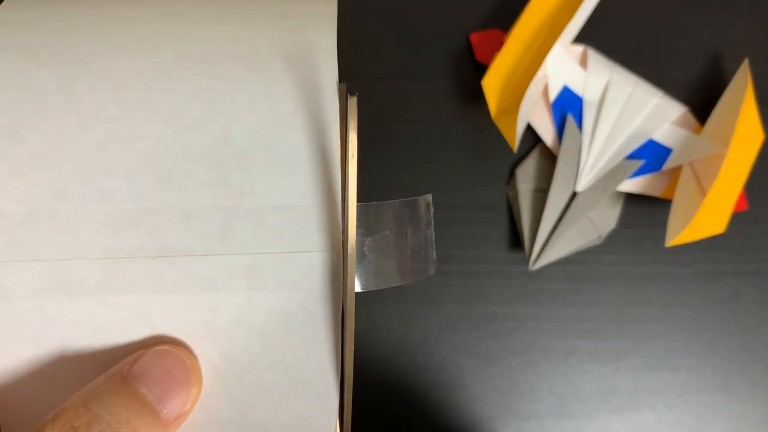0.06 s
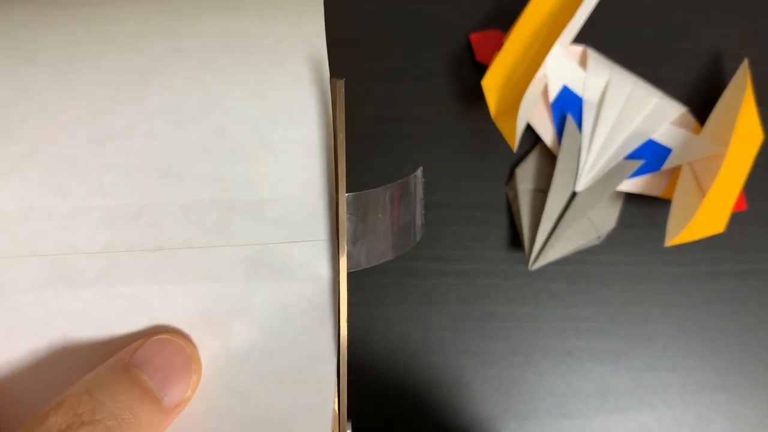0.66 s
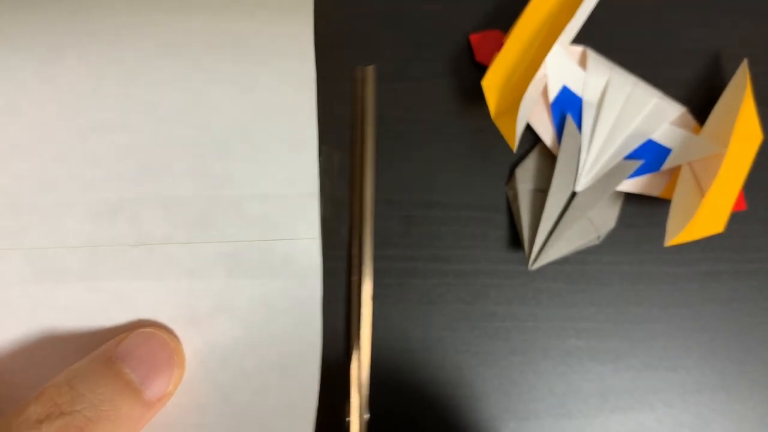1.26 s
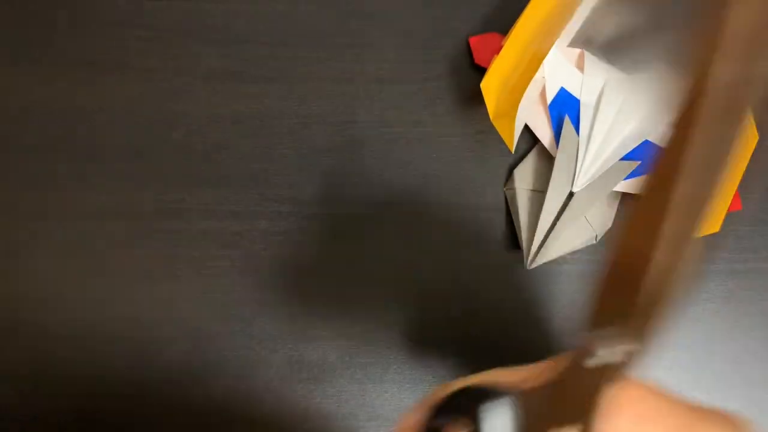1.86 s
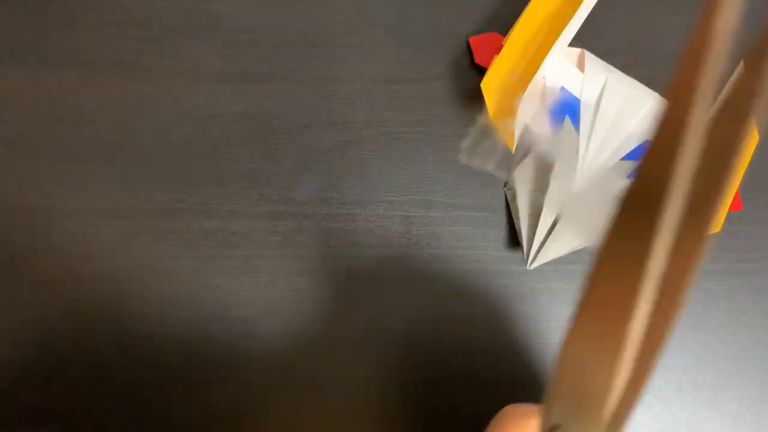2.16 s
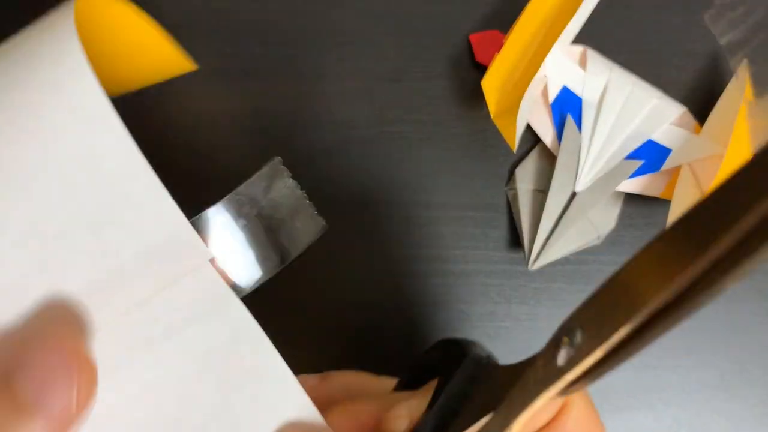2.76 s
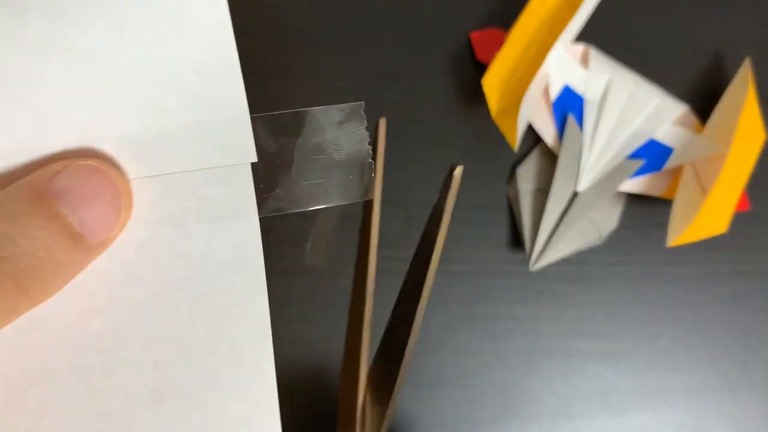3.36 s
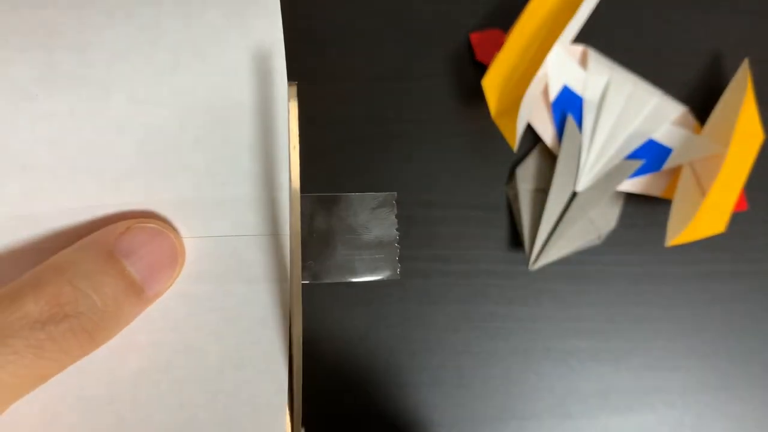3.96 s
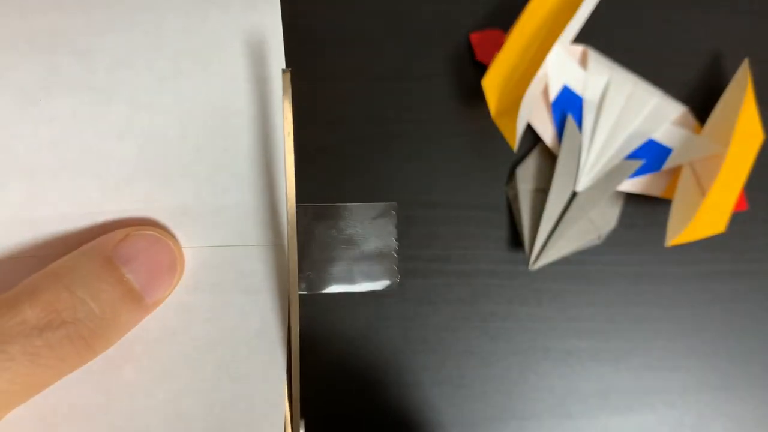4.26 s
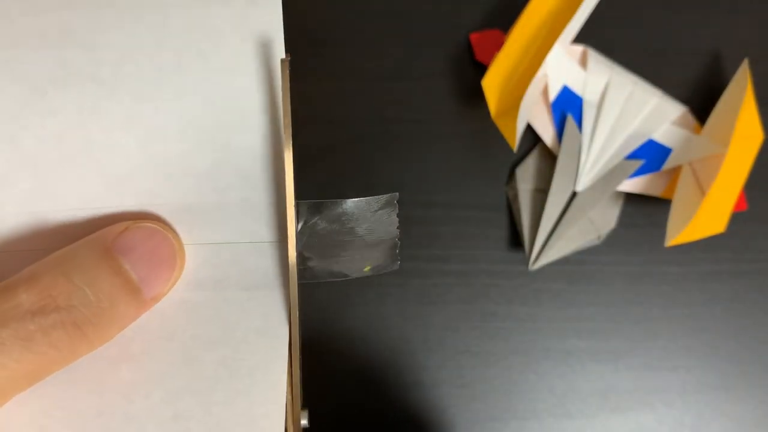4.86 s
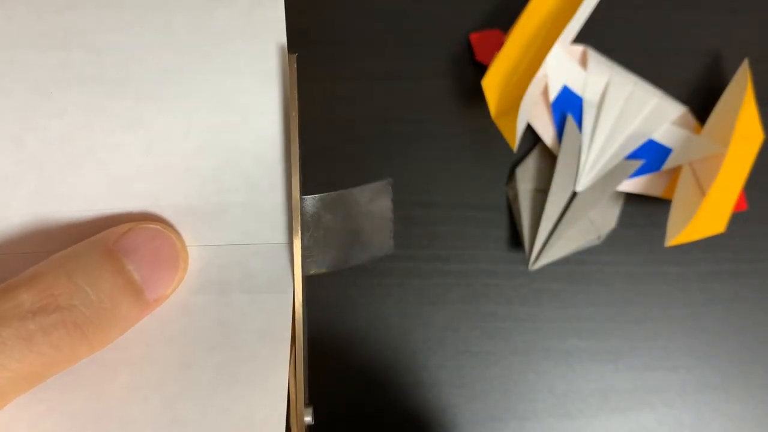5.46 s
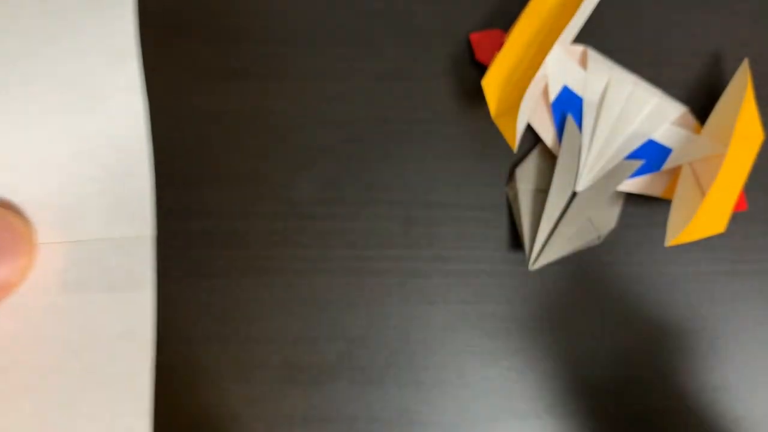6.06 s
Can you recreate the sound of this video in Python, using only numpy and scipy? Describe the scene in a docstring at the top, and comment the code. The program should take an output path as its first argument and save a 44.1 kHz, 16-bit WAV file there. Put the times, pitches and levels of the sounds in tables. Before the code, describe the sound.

Close to the microphone in a quiet little room, paper stirs faintly and scissors finish a snip through sticky tape. The paper then buckles, gives one sharp crack, the loudest sound, and flutters and crinkles as it is handled. After a stretch of softer brushing, the scissors work through more tape in tiny, slightly squeaky rasps, shutting with a light metal click and a soft thud on the table.

```python
"""Scissors trim clear tape from the edge of a paper sheet on a table, close up in a small quiet room.
The first cut ends in two short rasps and a clack of steel. The sheet is lifted and turned round:
it buckles with dull pops, snaps straight, flutters and brushes over the table, with crisp ticks of tape.
Then the blades rasp through a second strip in short slips and close with a clack and a soft table knock."""
import sys
import numpy as np
from scipy import signal
from scipy.fft import rfft, irfft, next_fast_len
from scipy.io import wavfile
from scipy.ndimage import uniform_filter1d

SR = 44100
rng = np.random.default_rng(int(sys.argv[2]) if len(sys.argv) > 2 else 0)


def master_out(mix):
    """Clip the mix to full scale and print it as 16-bit PCM to the path in sys.argv[1]."""
    frames = np.transpose(np.atleast_2d(mix))
    ceiling = np.clip(frames, -1, 1)
    pcm = np.round(ceiling * 32767).astype(np.int16)
    wavfile.write(sys.argv[1], SR, pcm)


N = 274302
TIME = np.arange(N) / SR

# tone of the room's rumble: (frequency [Hz], gain [dB])
RUMBLE_EQ = [(30, -22), (48, 7), (62, -3.5), (85, -14), (135, -17), (230, -28), (500, -45.5), (1500, -61)]
# tone of the faint background hiss: (frequency [Hz], gain [dB])
AIR_EQ = [(200, 12), (1000, 7), (3000, 0), (8000, -9), (16000, -10.5)]
# soft knocks on the table: (time [s], peak [dB], pitch [Hz], 60 dB decay [s])
TABLE_KNOCKS = [(0.796, -31, 156, 0.054), (1.021, -36.5, 123, 0.04), (1.156, -23, 204, 0.021),
                (1.182, -40.5, 86, 0.24), (2.811, -30.5, 88, 0.044), (5.632, -38.5, 164.6, 0.05),
                (5.646, -36, 56.6, 0.13)]
# the held sheet stirs faintly: (time [s], hiss [dB], flex [dB], sheen [dB])
SHEET_STIRRING = [(0,-66,-58.5,-79.5),(1.0,-70.5,-63.5,-81),(1.5,-63,-71,-78),(3.4,-65.5,-69.5,-85),(4.0,-73.5,-83.5,-86.5),(4.599,-69.5,-77,-80),(5.549,-82,-82,-93),(6.199,-78,-90.5,-82.5)]
# paper and tape brush table, hand or blade, at levels that the swell then scales down:
# (start [s], length [s], hiss [dB], flex [dB], sheen [dB])
SHEET_BRUSHES = [(0.413,0.11,-58,-56.5,-66),(0.663,0.059,-51,-49,-60.5),(1.319,0.13,-50.5,-57.5,-63),
                 (1.593,0.073,-49.5,-50,-55),(1.681,0.21,-47.5,-55.5,-54),(1.8,0.067,-30,-43,-46),(1.858,0.028,-34,-46,-54),(1.9,0.068,-46,-58,-54),(1.997,0.083,-44.5,-49.5,-50.5),(2.101,0.12,-44,-51,-50),
                 (2.206,0.078,-37.5,-47.5,-40),(2.305,0.024,-36,-46,-40.5),(2.361,0.043,-44,-50.5,-45),(2.462,0.029,-62,-46.5,-61),(2.548,0.16,-49.5,-55.5,-51.5),(2.714,0.028,-40,-43.5,-47),(2.759,0.13,-43.5,-52.5,-46),
                 (2.977,0.071,-47.5,-63,-50.5),(3.149,0.017,-48.5,-52.5,-52),(3.214,0.128,-50,-50,-62.5),(3.356,0.037,-45.5,-52,-55),(3.434,0.26,-53,-68,-65.5),(3.807,0.044,-54.5,-51.5,-68),(3.912,0.032,-56,-55.5,-69.5),
                 (4.026,0.077,-53.5,-51,-69),(4.141,0.024,-49.5,-44,-73),(4.284,0.016,-64.5,-60.5,-73.5),(4.444,0.022,-59.5,-56.5,-80),(4.685,0.053,-57.5,-55,-72),(4.802,0.046,-56,-71.5,-70),(4.904,0.083,-52,-63,-67.5),
                 (5.012,0.17,-48.5,-59,-58.5),(5.227,0.078,-48.5,-67.5,-64),(5.781,0.098,-58.5,-65.5,-74)]
# hiss of the rubbing edges: (frequency [Hz], gain [dB])
HISS_EQ = [(700,-20.5),(1750,-14),(2350,-2),(3100,-2),(4450,-5),(5400,-0.5),(7100,-2),(8700,-6.5),(10500,-19.5),(13000,-36)]
# mutter of the flexing sheet: (frequency [Hz], gain [dB])
FLEX_EQ = [(80, 6.5), (250, 2), (550, 3), (1100, 2), (1700, -12), (2600, -9), (6000, -55)]
# fine sheen on top of the rubbing: (frequency [Hz], gain [dB])
SHEEN_EQ = [(6000,-31),(9500,-2.5),(12000,3.5),(15000,-1),(16000,-8)]
# the sheet buckles, and the row at 1.157 s is the dull low knock of the blades closing: (time [s], peak [dB],
# pitch [Hz])
BUCKLE_POPS = [(0.019, -33.5, 980), (0.45, -39.5, 1030), (0.53, -39.5, 1050), (0.62, -37.5, 1030),
               (0.638, -26.5, 1070), (0.812, -35.5, 700), (0.91, -41, 970), (1.016, -28.5, 990),
               (1.0171, -36, 2320), (1.043, -37, 920), (1.157, -32.5, 740), (1.178, -26.5, 1020),
               (1.383, -27.5, 1140), (1.384, -30, 2460), (1.797, -30.5, 604), (1.849, -14.5, 700),
               (1.857, -29, 820), (1.928, -30, 646), (2.126, -37, 755), (2.172, -35.5, 690),
               (2.425, -27, 1040), (2.549, -37, 760), (2.608, -40, 1480), (2.646, -33.5, 750),
               (2.654, -32, 970), (2.727, -35.5, 880), (2.812, -35, 1040), (3.23, -42, 766),
               (3.793, -42, 599), (3.957, -46.5, 800), (5.472, -43.5, 791)]
# the whole sheet flicks over: (time [s], peak [dB], crackle 60 dB decay [s], crackle against crack [dB])
SHEET_SNAPS = [(0.7958, -35.5, 0.0056, 0.5), (1.8494, -13, 0.015, 0), (1.8563, -24.5, 0.4, 0),
               (1.8653, -30, .09, 0), (1.9284, -35.5, 0.041, 4), (2.4224, -31, 0.031, 18)]
# tone of a snap: (frequency [Hz], gain [dB])
SNAP_EQ = [(50,-30),(200,-26),(450,-7),(750,-2),(1250,2.5),(1900,-5),(2500,3.5),(4600,-5.5),(7500,-14),(16000,-19)]
# ticks of tape and blade: (time [s], papery peak [dB], crisp peak [dB], glassy peak [dB])
TAPE_TICKS = [(.0074,-41,-33,-40.5),(0.7944,-50,-53,-53),(.912,-44,-40.5,-50),(1.0155,-43,-54,-58),(1.1768,-40,-41,-58),(1.1848,-44,-29.5,-29.5),(1.6485,-39.5,-35,-35),(1.797,-59,-34.5,-42),
              (1.8487,-22,-14.5,-13),(1.855,-14,-23,-35),(1.9286,-53,-25,-32.5),(2.469,-50,-45,-47),(2.538,-43.5,-51,-68),(2.6092,-36.5,-46,-60),(2.728,-32,-39.5,-57),(2.7403,-34.5,-34,-43),
              (2.8106,-37.5,-40,-54),(2.864,-57,-34,-42.5),(3.154,-70.5,-47,-45),(3.801,-81.5,-55.5,-49),(4.101,-50.5,-47.5,-66),(4.5637,-70.5,-55,-53),
              (4.722,-52.5,-48.5,-64.5),(4.7355,-45.5,-46.5,-63.5),(5.0242,-61,-38.5,-45.5),(5.095,-60,-35,-39),(5.2548,-50.5,-45,-43),(5.473,-45,-42,-55.5),(5.6187,-45,-35.5,-35),(5.6318,-38,-31,-33.5)]
# the blades meet as a cut ends: (time [s], peak [dB])
BLADE_CLACKS = [(1.16, -36), (5.6344, -34.5)]
# ring of the struck steel: (frequency [Hz], relative level [dB], 60 dB decay [s])
STEEL_MODES = [(1180, -10.5, 0.041), (2356, -6, 0.046), (3580, 7.5, 0.0074), (4580, -26, 0.046)]
# resonances of the blades with tape between them: (frequency [Hz], width [Hz], gain [dB])
BLADE_MODES = [(2250, 71, 17.5), (4280, 370, 15.5), (5960, 2500, 7.5), (11700, 1600, 4), (14100, 1100, 0)]
# pitches along the cut: (time [s], tape flap [Hz], its upper ring [Hz], edge squeak [Hz])
CUT_PITCHES = [(1.2,740,2800,7330),(4.95,1140,3290,6870),(5.28,1060,2950,7540),(5.46,870,2920,7370),(5.63,877,3350,7180)]
# the blades slip forward: (time [s], length [s], rasp level [dB])
BLADE_SLIPS = [(1.153, 0.0095, -38), (1.375, 0.012, -44.5), (4.411, 0.017, -60.5), (4.886, .011, -55.5),
               (4.946, 0.0068, -59.5), (4.992, 0.0076, -53.5), (5.021, 0.044, -52.5), (5.09, 0.014, -43),
               (5.121, 0.0083, -42.5), (5.255, 0.013, -37.5), (5.283, 0.02, -42.5), (5.347, 0.024, -53.5),
               (5.384, 0.0087, -50.5), (5.433, 0.007, -50), (5.445, 0.0069, -45.5), (5.457, 0.018, -47),
               (5.623, 0.012, -39.5), (5.639, 0.0098, -46), (5.834, 0.012, -52), (5.875, 0.0056, -61.5)]
# the left microphone port leads the right: (frequency [Hz], phase lead [rad])
PORT_PHASE = [(0,0.5),(1100,0.07),(3000,-2.5),(4900,-0.87),(5800,-4.5),(7000,-5.5),(13000,0),(14000,-0.96),(16000,4.5)]
# the left port's level against the right: (frequency [Hz], level [dB])
PORT_LEVEL = [(200,-0.5),(900,-1.5),(2000,0),(2800,1.5),(4800,4),(7500,0)]


def amp(db):
    """Decibels to amplitude."""
    return 10 ** (np.asarray(db) / 20)


def unit(x):
    """Scale to an rms of one."""
    return x / np.sqrt(np.mean(x ** 2))


def peak(x):
    """Scale so that the loudest two milliseconds have an rms of one."""
    return x / np.sqrt(uniform_filter1d(np.mean(x ** 2, axis=0), size=88).max())


def add(out, start, x):
    """Mix x into out from start, in seconds."""
    i = max(int(start * SR), 0)
    out[:, i:i + x.shape[1]] += x[:, :N - i]


def ring(x, hz, width):
    """One damped resonance."""
    return signal.lfilter(*signal.iirpeak(hz, hz / width, fs=SR), x)


def band(x, lo_hz, hi_hz):
    """Band-pass with soft edges."""
    edges = [lo_hz, min(hi_hz, SR / 2 - 1)]
    return signal.sosfilt(signal.butter(2, edges, "band", fs=SR, output="sos"), x)


def colour(x, points, size=4096):
    """Causal EQ through (frequency [Hz], gain [dB]) points, built from the cepstrum."""
    hz, db = np.transpose(points)
    grid = np.maximum(np.fft.rfftfreq(size, 1 / SR), 1)
    cepstrum = irfft(np.log(amp(np.interp(np.log(grid), np.log(hz), db))))
    cepstrum[1:size // 2] *= 2
    cepstrum[size // 2 + 1:] = 0
    impulse = irfft(np.exp(rfft(cepstrum)))
    return signal.fftconvolve(x, impulse[None], axes=1)[:, :x.shape[1]]


def grains(n, rate, spread_db):
    """Tiny catches of uneven size, rate of them a second."""
    count = int(rate * n / SR) + 1
    place, chance = rng.random((count, 2)).T
    strength = amp(-spread_db * np.log(.01 + .99 * chance)) * rng.choice([-1, 1], count)
    return np.tile(np.bincount((place * n).astype(int), strength, n), (2, 1))


def strike(t60, tail_db, size=8192):
    """A sudden release and the thin, fading flutter of the sheet after it."""
    t = np.arange(size) / SR
    flutter = band(grains(size, rate=19000, spread_db=3.2), 650, 20000)
    x = flutter * amp(-60 * t / t60) * np.minimum(t / 0.0064, 1)
    x *= amp(tail_db) / np.sqrt(np.sum(x ** 2) / 2)
    x[:, 0] += 1  # the release itself
    return x


def wander(rate):
    """Slow random drift with a spread near one."""
    hold = int(SR / rate)
    steps = np.repeat(rng.standard_normal(N // hold + 1), hold)
    return unit(uniform_filter1d(steps, hold))[:N]


def patches(x, sway_db=4, size=256):
    """Contact shifts from patch to patch of the sheet: narrow resonances come and go."""
    spectrum = signal.stft(x, nperseg=size)[2]
    sway = uniform_filter1d(rng.standard_normal(spectrum.shape), size=2, axis=1)
    sway = uniform_filter1d(sway, size=14, axis=2)
    return signal.istft(spectrum * amp(sway_db * unit(sway)))[1][:, :x.shape[1]]


def room_tone():
    """A bed of low rumble, nearly mono and leaning left, with a faint hiss."""
    rumble = unit(colour(rng.standard_normal(N) + 0.067 * rng.standard_normal((2, N)), RUMBLE_EQ))
    air = unit(colour(rng.standard_normal((2, N)), AIR_EQ))
    return rumble * amp([[-53.5], [-57]]) + air * amp(-78)


def room_reverb(x, t60, wet_db):
    """Near walls give a short, wide tail, thinner and duller than the source."""
    t = np.arange(SR // 2) / SR
    tail = rng.standard_normal((2, len(t))) * amp(-60 * t / t60) * (t > .004)
    tail = signal.lfilter(*signal.butter(1, [600, 5500], "band", fs=SR), tail)
    tail *= amp(wet_db) / np.sqrt(np.sum(tail ** 2) / 2)
    return x + signal.fftconvolve(x, tail, axes=1)[:, :N]


def table_knocks():
    """Hand and scissors nudge the table top, which gives a few low cycles."""
    out = np.zeros((2, N))
    t = np.arange(SR // 2) / SR
    for start, db, hz, t60 in TABLE_KNOCKS:
        thud = amp(db - 60 * t / t60) * np.sin(2 * np.pi * hz * t)
        add(out, start, thud[None])
    return out


def sheet_flutter(start_s=1.78, end_s=2.87, level_db=-55.5):
    """The lifted sheet wobbles in the air in soft, uneven low flaps."""
    held = uniform_filter1d(1. * ((TIME > start_s) & (TIME < end_s)), size=SR // 20)
    flaps = unit(band(grains(N, rate=160, spread_db=2), 70, 190))
    return amp(level_db) * held * flaps


def rubbing_envelopes(attack_share=0.14, swell_db=3.5, release_s=0.014):
    """Gains of hiss, flex and sheen: faint stirring, plus brushes that grip, gather speed and let go."""
    times, *levels = np.transpose(SHEET_STIRRING)
    sway_db = 2.5 * wander(rate=9)
    power = amp([np.interp(TIME, times, db) + sway_db for db in levels]) ** 2
    for start, length, *brush_db in SHEET_BRUSHES:
        t = np.arange(int((length + .15) * SR)) / SR
        attack = np.minimum(t / (attack_share * length), 1)
        swell = amp(swell_db * (np.minimum(t / length, 1) - 2))
        release = np.exp(-np.maximum(t - length, 0) / release_s)
        add(power, start, np.outer(amp(brush_db), attack * swell * release) ** 2)
    return np.sqrt(power)


def sheet_rubbing():
    """Fibres catch and let go: fine hiss and crinkles from the edges, a coarser mutter from the sheet."""
    hiss_gain, flex_gain, sheen_gain = rubbing_envelopes()
    grip_db = 1.9 * wander(rate=55)  # stick and slip
    fibres = unit(grains(N, rate=14000, spread_db=3))
    crinkles = unit(grains(N, rate=320, spread_db=3.6))
    edges = fibres + amp(-7.5) * crinkles
    # paper dragging along the open blades rings them now and then
    blades = sum(amp(db) * ring(edges, hz, width) for hz, width, db in BLADE_MODES)
    edges = patches(edges + amp(-14.5 + 4 * wander(rate=6)) * blades)
    hiss = hiss_gain * unit(colour(edges, HISS_EQ))
    sheen = sheen_gain * unit(colour(edges, SHEEN_EQ))
    flex = flex_gain * unit(colour(grains(N, rate=900, spread_db=2.4), FLEX_EQ))
    return amp(grip_db) * (hiss + sheen + flex)


def sheet_pops():
    """A dent in the sheet flips through with a dull pop: one or two cycles, then flutter. The same pop also
    gives the closing blades their dull low knock at 1.157 s."""
    out = np.zeros((2, N))
    for start, db, hz in BUCKLE_POPS:
        dent = ring(strike(t60=.04, tail_db=-6), hz, width=0.77 * hz)
        add(out, start + 0.0008, amp(db) * peak(band(dent, 0.061 * hz, 1.2 * hz)))
    return out


def sheet_snaps():
    """The sheet whips straight with a broad crack."""
    out = np.zeros((2, N))
    for start, db, t60, crackle_db in SHEET_SNAPS:
        add(out, start, amp(db) * peak(colour(strike(t60, crackle_db), SNAP_EQ)))
    return out


def tape_ticks(creep_s=0.0016):
    """Tape crinkles and edges catch: a brief creep, then a click in three bands, each with its own ring."""
    out = np.zeros((2, N))
    lead = SR // 200
    bands_hz = [(2200, 4500), (4600, 8600), (10800, 15500)]  # papery, crisp, glassy
    for start, *levels in TAPE_TICKS:
        creep = 0.11 * rng.standard_normal((2, lead)) * np.exp(np.arange(-lead, 0) / SR / creep_s)
        snag = np.hstack([creep, strike(t60=.006, tail_db=1)])
        click = 0
        for db, (lo, hi) in zip(levels, bands_hz):
            ping = ring(snag, rng.uniform(lo, hi), width=lo / 10)
            click += amp(db) * peak(band(snag + 2 * ping, lo, hi))
        add(out, start + .001 - lead / SR, click)
    return out


def blade_clacks():
    """The blades meet and ring briefly, damped by the hand."""
    out = np.zeros((2, N))
    t = np.arange(SR // 10) / SR
    for start, db in BLADE_CLACKS:
        steel = sum(amp(mode_db - 60 * t / t60) * np.sin(2 * np.pi * hz * t)
                    for hz, mode_db, t60 in STEEL_MODES)
        add(out, start, amp(db) * peak(steel[None]))
    return out


def scissor_cuts(squeak_db=-4.5, tear_db=-20.5):
    """Each slip tears the tape in dense catches that ring flap and blades; steel on steel squeaks."""
    out = np.zeros((2, N))
    t = np.arange(SR // 12) / SR
    times, *pitches = np.transpose(CUT_PITCHES)
    for start, length, db in BLADE_SLIPS:
        push = np.minimum(t / 0.0041, 1) * np.exp(-np.maximum(t - length, 0) / 0.0024)
        catches = patches(grains(len(t), rate=4500, spread_db=2.3))
        flap_hz, upper_hz, squeak_hz = (np.interp(start, times, hz) for hz in pitches)
        flap = amp(16.5) * ring(catches, flap_hz, width=230)
        flap += amp(8) * ring(catches, upper_hz, width=240)
        blades = sum((-1) ** k * amp(mode_db) * ring(catches, hz * rng.uniform(0.915, 1.05), width)
                     for k, (hz, width, mode_db) in enumerate(BLADE_MODES))
        rasp = unit(flap + blades)
        squeak = amp(squeak_db) * unit(ring(ring(catches, squeak_hz, width=810), squeak_hz, width=1500))
        tear = amp(tear_db) * unit(band(catches, 4500, 22000))  # the film splits
        add(out, start - .001, push * amp(db) * (rasp + squeak + tear))
    return out


def scene():
    """Paper, tape and scissors on the table, in a tight room over its quiet bed."""
    foley = sheet_rubbing() + sheet_flutter() + scissor_cuts() + blade_clacks()
    foley += sheet_pops() + tape_ticks() + sheet_snaps() + table_knocks()
    return room_reverb(foley, t60=0.14, wet_db=-13) + room_tone()


def record(dry):
    """The microphone sheds the deepest bass, its two ports differ in phase and level, and the top is cut."""
    low_cut = signal.butter(4, 38, "high", fs=SR, output="sos")
    high_cut = signal.ellip(8, .2, 70, 15700, fs=SR, output="sos")
    size = next_fast_len(N + 4096)
    hz = np.fft.rfftfreq(size, 1 / SR)
    balance_db = np.interp(hz, *np.transpose(PORT_LEVEL))
    lead_rad = np.interp(hz, *np.transpose(PORT_PHASE))
    left = amp(balance_db / 2) * np.exp(.5j * lead_rad)  # each port takes half, in opposite directions
    spectrum = rfft(signal.sosfilt(low_cut, dry), size)
    stereo = irfft(spectrum * [left, 1 / left], size)[:, :N]
    return signal.sosfilt(high_cut, np.clip(stereo, -1, 1))


dry = scene()
out = record(dry)
master_out(out)
```